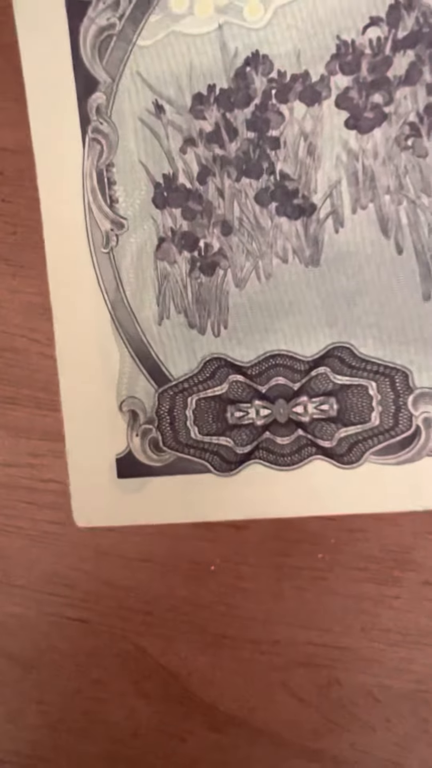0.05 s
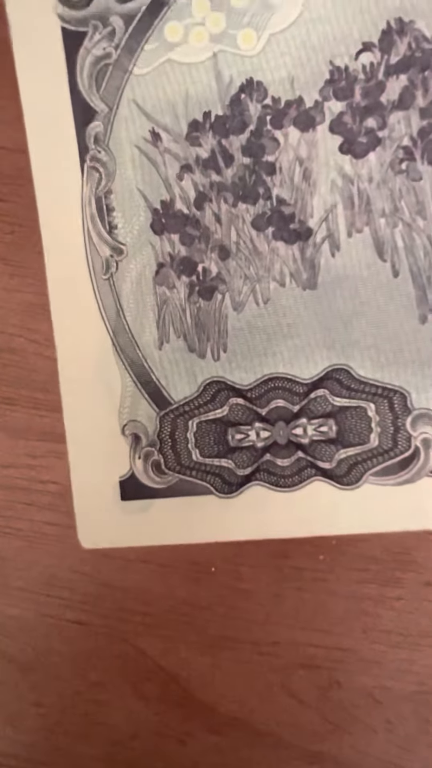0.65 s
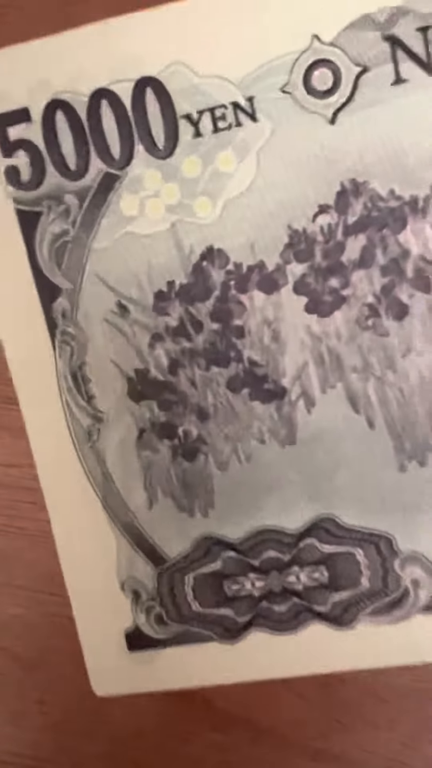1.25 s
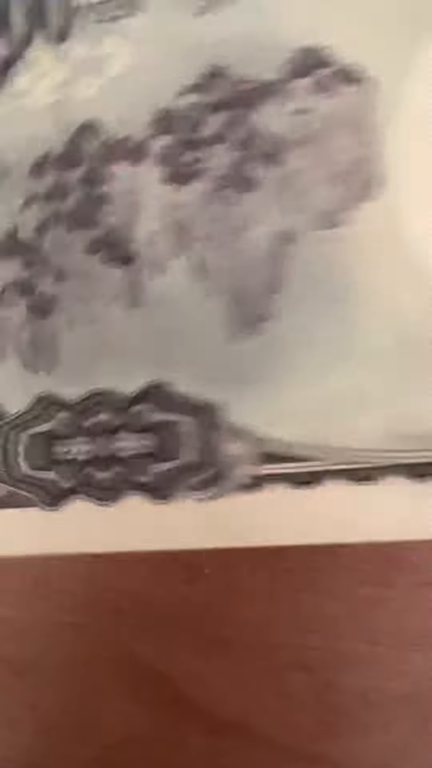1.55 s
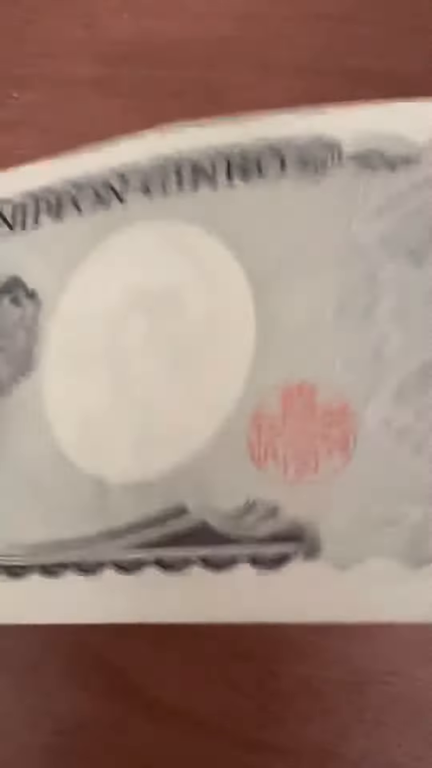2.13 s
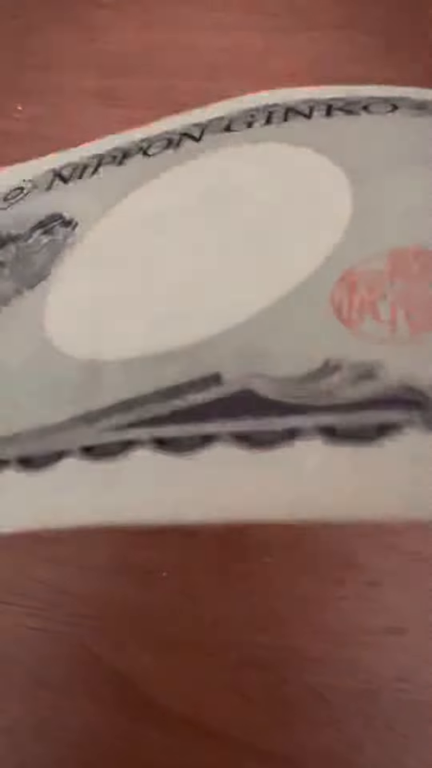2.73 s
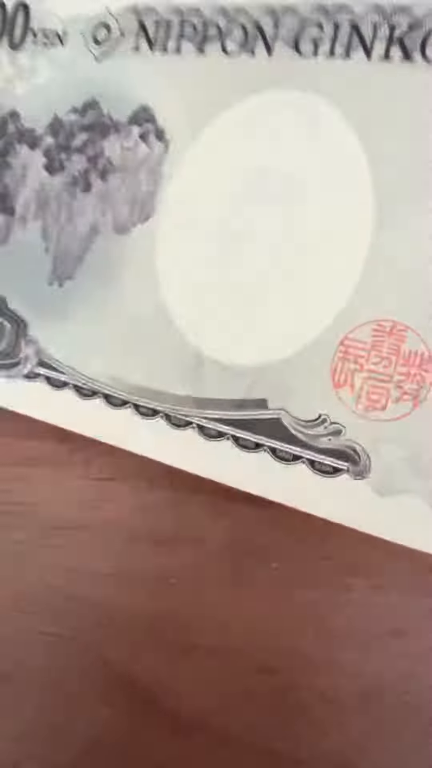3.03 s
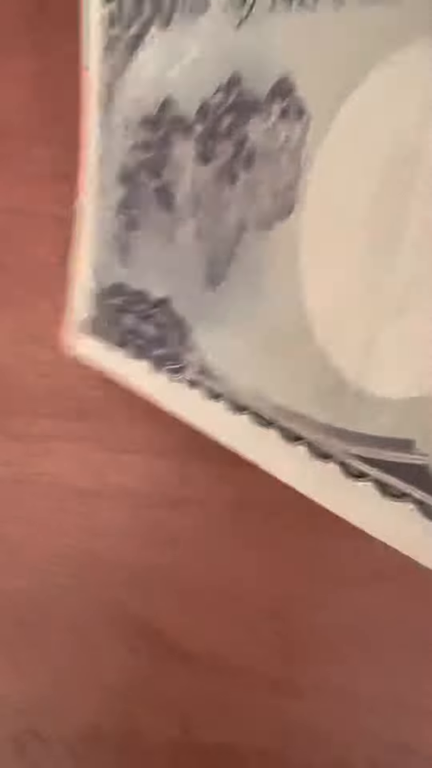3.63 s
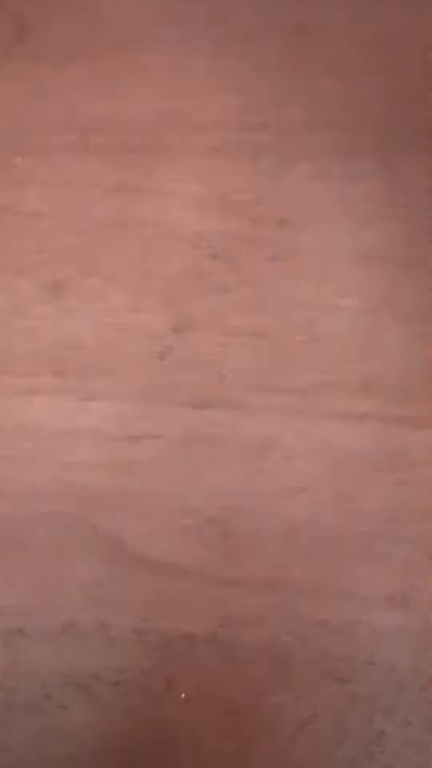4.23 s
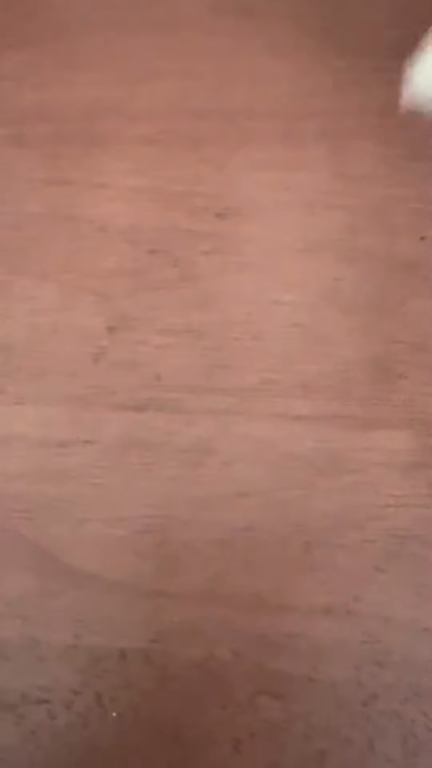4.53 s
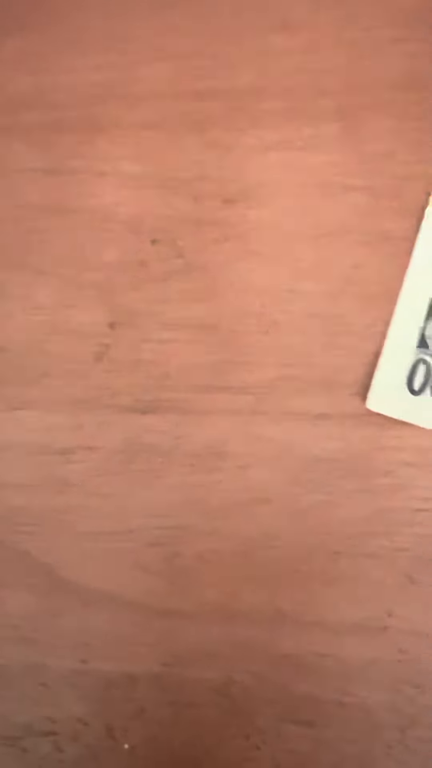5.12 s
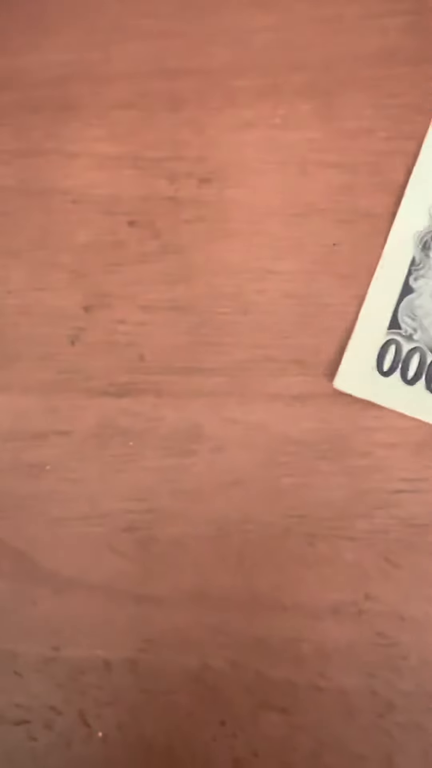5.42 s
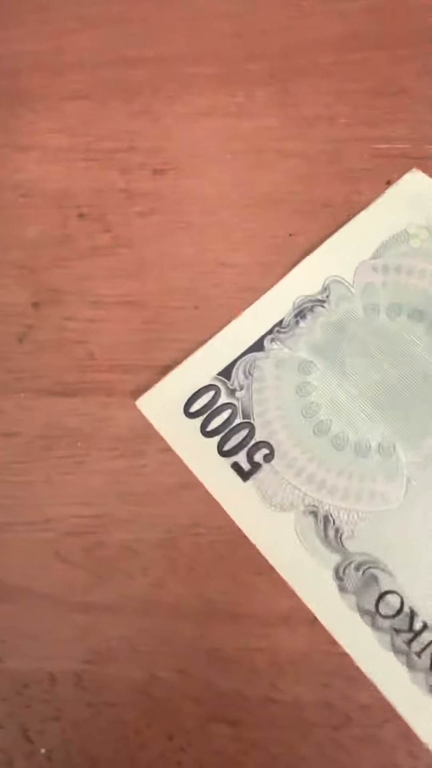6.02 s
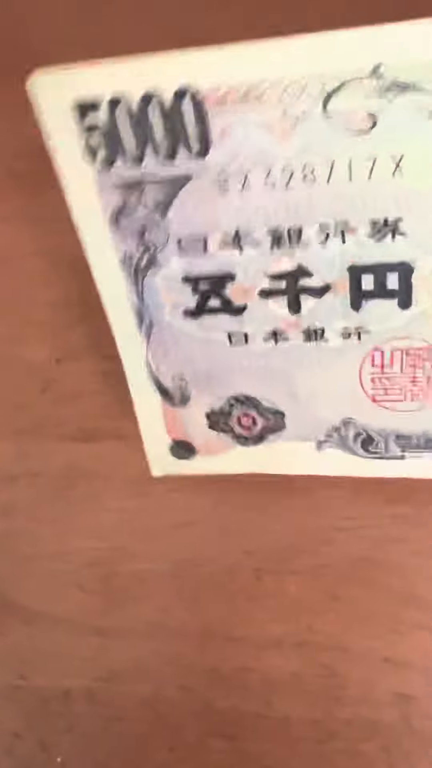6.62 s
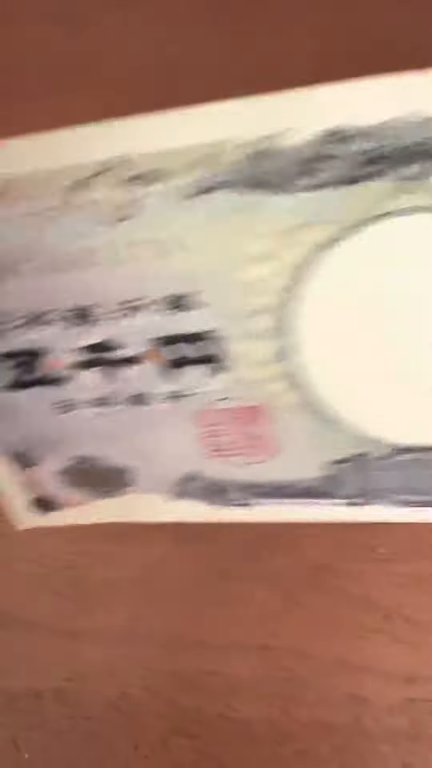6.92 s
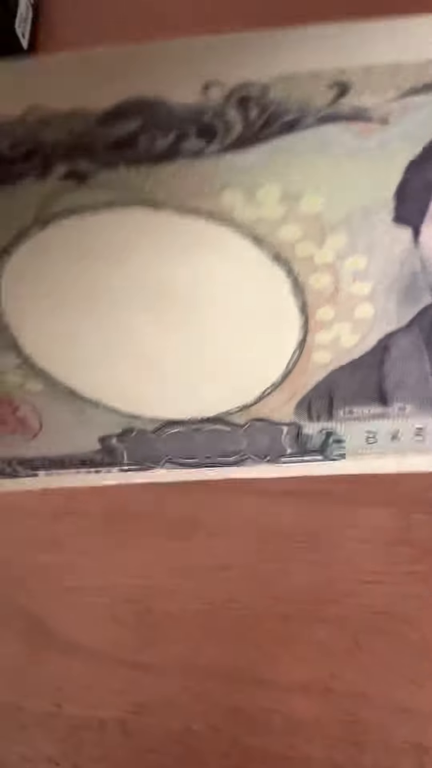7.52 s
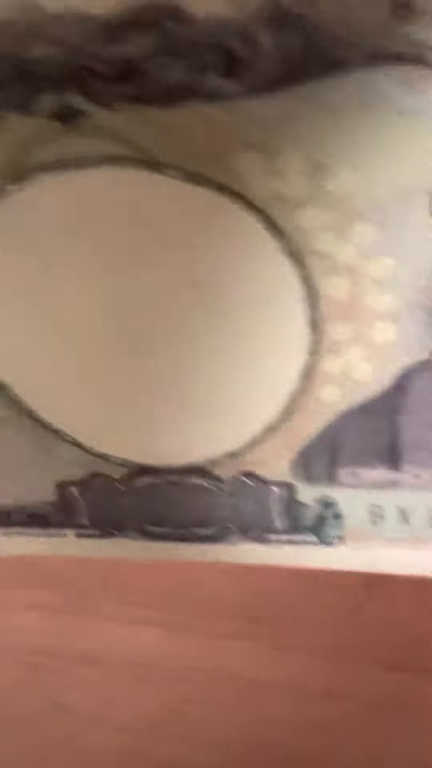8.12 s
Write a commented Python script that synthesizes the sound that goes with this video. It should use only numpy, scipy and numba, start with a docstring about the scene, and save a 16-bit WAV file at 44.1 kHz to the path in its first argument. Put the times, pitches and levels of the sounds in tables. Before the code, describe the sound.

A crisp paper banknote is flexed, flapped, slid over a wooden table and turned over, crinkling close up in a quiet room.

```python
"""A small quiet room, a stereo microphone close over a wooden table, the subject a little to the right.
A crisp paper banknote is picked up, flexed, laid down, slid along the wood and turned over.
The sheet buckles with dull flaps, its creases give way in tiny snaps, fingers rub and thud on it,
and it hisses as it is pushed over the table. At this distance its swings waft air at the microphone.
Behind it the room rumbles and the mains hum."""
import sys
import numpy as np
from scipy import signal
from scipy.fft import rfft, irfft, next_fast_len
from scipy.io import wavfile
from scipy.ndimage import map_coordinates
from numba import njit

SR = 44100
rng = np.random.default_rng(int(sys.argv[2]) if len(sys.argv) > 2 else 0)


def store_pcm(level_fs):
    """Save levels as 16-bit WAV."""
    pcm = np.round(np.clip(level_fs, -1, 1) * 32767).astype(np.int16)
    wavfile.write(sys.argv[1], SR, np.atleast_2d(pcm).T)


N = 368661

# the sheet buckles or lands: (time [s], length [ms], level [dB], top edge [Hz], body [dB],
# air puff [dB], pitch of the modes [ratio], ring of the modes [dB], hollow of the bend [Hz])
FLAPS = [(1.5198, 8.3, 5, 2290, -4, 8, 1.0, 5.5, 1800), (1.618, 2.6, -9.5, 1390, 6, 11, 1.0, -4, 1010),
         (2.9664, 2.4, 0, 1800, 7, -25, 1.0, 4.5, 370),
         (3.0032, 2.8, -3.5, 1900, -0.5, -12, 1.02, 11.5, 1120),
         (3.5, 2.2, -18.5, 3220, 22, 28, 1.0, -9, 247), (4.037, 3.6, -7.5, 3130, 7.5, 1, 1.0, -4, 2870),
         (4.142, 22.4, -5, 2060, 7.5, 16, 0.7, 2.5, 232.4), (4.591, 9.3, -7, 3250, 7, 2, 1.0, 5.5, 1620),
         (4.6462, 1.74, -12.5, 2100, 11.5, -2, 1.0, 7, 1300),
         (6.035, 3.6, -23, 2210, 3, 5, 1.0, -5.5, 1820), (6.286, 3, -4.5, 3180, 9, 17, 1.03, -14, 650),
         (6.317, 7.5, 1, 2160, 6, 8, 1.03, -4, 595), (6.3944, 4.5, -2, 3270, 6.5, 11, 0.75, 4, 1160),
         (7.062, 2.9, -2, 1650, 10, 9, 1.0, 1.5, 500)]
# bending modes that outlast the rest: (frequency [Hz], t60 [s], relative level [dB])
SHEET_MODES = [(363.8, 0.15, 7), (706, 0.11, -9), (1084, 0.064, 0), (1330, 0.06, -15.5), (1627, 0.068, 2.5),
               (1840, 0.073, -3), (2280, 0.065, 0.5)]
# creases give way: (time [s], length [ms], level [dB], tilt [dB/octave])
CRINKLES = [(0.877, 12, -43, 6), (1.66, 9.6, -6.5, -1), (1.666, 20.6, -7, 0), (1.69, 0.72, -22.5, -9),
            (1.819, 15, -20, -1), (1.868, 0.75, -13, -9), (1.896, 5, -16.5, 0), (2.181, 4.6, -25.5, -3),
            (2.2039, 1.6, -26, -8), (2.462, 4.6, -25, 1), (2.511, 5.5, -19.5, -1), (2.558, 6, -33.5, -8.5),
            (2.652, 2.2, -37.5, -13.5), (2.791, 17, -28.5, -4.5), (2.871, 2, -40, -11.5),
            (2.917, 15, -22, -9.5), (3.0013, 10, -16, -2.5), (3.38, 6.5, -30, -6.5),
            (3.698, 4.1, -26.5, -2), (3.7236, 8.2, -26, -1.5), (4.057, 11, -22, 5),
            (4.1268, 6.7, -7.5, -0.5), (4.569, 19, -7, 0), (4.593, 23, -9, 0.5), (4.826, 1.5, -36.5, 6),
            (5.992, 11, -29, 12), (6.074, 3.4, -18, 7), (6.134, 5, -20.5, 4), (6.175, 32, -15.5, 3.5),
            (6.211, 2.6, -19, -1), (6.2497, 21, -7, -0.5), (6.287, 5.4, -7.5, 2), (6.3962, 6.1, -19.5, 3.5),
            (6.725, 7.2, -16, 1.5), (6.761, 13, -18.5, -0.5), (6.963, 5.5, -15, 0.5),
            (7.592, 8.9, -33.5, -4.5), (7.741, 3.6, -35, -5), (8.168, 3.3, -40.5, -1.5)]
# spectrum of one snap of a crease: (frequency [Hz], gain [dB])
SNAP_COLOUR = [(100, -24), (600, -17), (850, -8), (1200, -5), (1800, 2.5), (2150, -1.5), (2650, -7.5),
               (3800, -1), (5200, -3.5), (7000, 2), (9000, -6), (12000, -9), (15000, -14.5)]
# spectrum of the corner flicking off a fingertip: (frequency [Hz], gain [dB])
FLICK_COLOUR = [(150, -27.5), (900, -3), (1700, -3), (2200, -11.5), (3200, 5.5), (4200, 1), (6300, 1.5),
                (8300, 9), (11000, 6), (15500, -3)]
# a finger strokes the paper: (start [s], length [s], rustle [dB], hiss [dB],
# swell from start to end [dB], rasp [Hz], sheen over the hiss [dB])
STROKES = [(1.422, 0.095, -69.5, -69, 13, 1900, -8), (1.531, 0.095, -62.5, -64, 11, 1900, -9),
           (1.691, 0.022, -58, -57, 6.5, 1800, -6), (1.776, 0.039, -60, -65, 3, 1900, -16),
           (1.906, 0.038, -51, -44, 2.5, 1850, -8), (2.028, 0.098, -57.5, -53, 6, 1850, -1.5),
           (2.202, 0.18, -51.5, -54.5, 0, 1923, 2), (2.335, 0.055, -71, -44.5, 4, 1900, 0.5),
           (2.433, 0.11, -59.5, -60, 3.5, 1900, -2), (2.9, 0.021, -54, -51.5, 8.5, 1650, -2),
           (2.951, 0.057, -56.5, -60.5, 16, 1650, -10), (3.049, 0.087, -67, -67, -5, 1600, -13),
           (3.226, 0.18, -65.5, -65, 6.5, 2000, -2.5), (3.444, 0.049, -56, -49.5, 2, 2000, 7.5),
           (3.537, 0.09, -56.5, -58.5, 4, 1800, -4), (3.719, 0.21, -65, -61.5, 5.5, 2200, 2),
           (3.879, 0.16, -56, -60.5, -11, 2500, 9), (4.052, 0.14, -56, -56.5, -5.5, 2200, 1.5),
           (4.244, 0.028, -59, -52, 3.5, 2300, 3), (4.307, 0.088, -64.5, -58.5, -5.5, 2600, -1.5),
           (4.416, 0.12, -60.5, -56.5, -8.5, 2200, 3.5), (4.584, 0.19, -61.5, -58.5, -36.5, 3300, 1.5),
           (5.996, 0.15, -73, -57.5, 0, 2000, -2), (6.18, 0.095, -49.5, -54, 12, 2500, 2),
           (6.315, 0.075, -56.5, -59, -13.5, 2100, 1), (6.419, 0.059, -58.5, -50.5, 4.5, 2200, 0.5),
           (6.481, 0.092, -58.5, -58, 9, 2000, -1), (6.735, 0.065, -61, -66, -2, 1900, -9),
           (6.957, 0.09, -59, -57, 3, 2000, 1), (7.087, 0.055, -61.5, -66, -1.5, 2000, -2),
           (7.516, 0.094, -69, -72, -4.5, 3300, -0.5), (7.747, 0.037, -64, -67, 10.5, 3300, -16)]
# spectrum of the rubbed sheet: (frequency [Hz], relative level [dB])
RUSTLE_COLOUR = [(200, -5), (500, -3.5), (1000, -1), (1350, -2), (1750, -2), (2150, -2.5), (2900, -5),
                 (3400, -2.5), (4400, -4), (5200, -10), (9000, -33.5)]
# spectrum of its rubbed fibres: (frequency [Hz], relative level [dB])
HISS_COLOUR = [(2000, -35.5), (3800, 0), (5000, -4.5), (5700, 3), (6600, 6), (8000, -1), (9000, -3.5),
               (10200, -10), (11500, -5.5), (12800, -11), (15500, -8)]
# pushes along the wood: (start [s], length [s], level [dB], swell from start to end [dB], speed [0-1])
PUSHES = [(5.285, 0.048, -65, -3, 0), (5.397, 0.14, -53, 14.5, 1.0), (5.563, 0.077, -50, 9.5, 0.93),
          (5.682, 0.077, -60, 7, 0.2), (5.805, 0.27, -56, -0.5, 0.05)]
# spectrum of a fast slide: (frequency [Hz], relative level [dB])
FAST_SLIDE_COLOUR = [(800, -16), (2000, -10), (3100, -15), (4400, -8), (5300, -12), (6300, -5.5),
                     (7500, -1.5), (9000, 3.5), (10300, -5), (11300, 1), (13000, -5.5), (15500, 1.5)]
# spectrum of a slow slide: (frequency [Hz], relative level [dB])
SLOW_SLIDE_COLOUR = [(1000, -11.5), (2200, -9), (3000, -16.5), (3900, -14), (5400, -14), (6300, 1.5),
                     (7600, -3.5), (9000, -2.5), (12000, -14), (15500, -6.5)]
# a fingertip meets the taut note, or the table through it: (time [s], pitch [Hz], level [dB], t60 [s])
THUDS = [(1.661, 123, -34.5, 0.14), (4.138, 62, -27, 0.12), (4.142, 165, -30, 0.06),
         (7.0645, 487, -16.5, 0.011), (7.0717, 87, -26.5, 0.11)]
# air shoved at the microphone: (middle [s], half length [ms], level [dB], top edge [Hz])
SWINGS = [(3.675, 32, -44, 113.5), (3.744, 23, -45, 158), (3.961, 32, -46.5, 164), (4.147, 19.5, -35, 200),
          (4.386, 13, -48, 355), (4.449, 39, -49, 175), (4.597, 12, -37, 107)]
# stereo width of the paper at the microphone: (frequency [Hz], side over mid [dB])
PAPER_WIDTH = [(100, -34.5), (350, -24.5), (700, -3), (1200, -9.5), (1900, -25), (2800, -3), (4500, -9.5),
               (7000, -1.5), (12000, -4.5)]
# spectrum of the room tone: (frequency [Hz], relative level [dB])
AIR_COLOUR = [(22, -27), (45, -6), (62, 0), (130, -4.5), (180, -12.5), (260, -9), (400, -10), (520, -16),
              (750, -19), (1100, -27), (1550, -34.5), (1950, -36.5), (2800, -47.5), (5500, -51.5),
              (8000, -52.5), (15500, -62.5)]
# stereo width of the room tone: (frequency [Hz], side over mid [dB])
AIR_WIDTH = [(50, -28), (130, -17.5), (300, -14.5), (550, -3.5), (800, 0.5), (1300, -0.5), (2000, -13.5),
             (4000, -3), (12000, -1.5)]
# mains hum: (frequency [Hz], level [dB])
HUM = [(119.5, -62.5)]
# a wide, low rumble swells: (start [s], length [s], level [dB])
RUMBLES = [(5.04, 0.072, -50), (5.734, 0.56, -57.5)]
# thin bands of hiss in the background: (centre [Hz], width [Hz], level [dB])
HISS_BANDS = [(1900, 400, -89.5), (3317, 140, -88.5), (6840, 220, -95), (9650, 180, -95.5)]


def flaps(t60_at_1khz=0.077, damping_slope=0.73, travel_ms=0.3, rise_share=0.26):
    """Each buckle rings the sheet's crowded bending modes; low ones arrive later and last longer."""
    out, crowd, t = np.zeros((2, N)), 0, np.arange(SR // 5) / SR
    edges_hz = 35 * 2 ** (np.arange(18) / 2)   # half octaves
    length_ms = np.array(FLAPS)[:, 1:2]
    for low, high in zip(edges_hz, edges_hz[1:]):
        hz = np.sqrt(low * high)
        age = t - travel_ms / 1000 * np.sqrt(1000 / hz)   # bending waves speed up as root frequency
        t60 = t60_at_1khz * (1000 / max(hz, 260)) ** damping_slope
        rise = np.clip(age * 1000 / (rise_share * length_ms), 0, 1)
        decay = from_db(-60 * np.maximum(age - length_ms / 1000, 0) / t60)
        push = rise * decay * rng.standard_normal((2, len(FLAPS), len(t)))
        band = energy_one(butter(push, 2, [low, high], "band"))
        crowd = crowd + band * np.sqrt(2 * (high - low) / SR)
    for k, (s, _, db, top_hz, body_db, puff_db, pitch_ratio, ring_db, hollow_hz) in enumerate(FLAPS):
        sheet = crowd[:, k] + from_db(ring_db) * sheet_ring(t, pitch_ratio)
        flap = colour(sheet, lambda hz: db + flap_colour(hz, top_hz, body_db, puff_db)
                      + hollow(hz, hollow_hz))
        add(out, s, flap)
    return stereo(out, PAPER_WIDTH)


def sheet_ring(t, pitch_ratio):
    """The strongest modes of the held sheet die away; they lie lower when it is held slack."""
    out = 0
    for hz, t60, db in SHEET_MODES:
        decay = from_db(-60 * t / t60)
        tone = np.sin(2 * np.pi * (pitch_ratio * hz * t + rng.random((2, 1))))
        out = out + from_db(db) * tone * 2 * decay / decay.sum()
    return out


def flap_colour(hz, top_hz, body_db, puff_db, body_hz=700, puff_hz=130, bass_hz=58, gain_db=-0.5):
    """Gain in dB of a flap: shoved air at the bottom, the sheet's body above, then a steep top edge."""
    air_share = 1 / (1 + (hz / puff_hz) ** 4)
    lows_db = air_share * puff_db + (1 - air_share) * body_db / (1 + (hz / body_hz) ** 4)
    edge = 1 / np.sqrt(1 + (hz / top_hz) ** 10)
    treble_leak = from_db(-25) / (1 + (hz / top_hz / 2) ** 2)
    bass_cut_db = 10 * np.log10(1 + (bass_hz / (hz + 10)) ** 4)
    return gain_db + lows_db + 20 * np.log10(edge + treble_leak) - bass_cut_db


def hollow(hz, centre_hz, peak_db=2.5, width_octaves=0.18):
    """Gain in dB of the cupped sheet, which favours one pitch for each way it is bent."""
    return peak_db / (1 + (np.log2((hz + 1) / centre_hz) / width_octaves) ** 2)


def crinkles(crest=0.27, max_crack_share=0.46, snap_ms=1.05, ring_db=-20, ring_t60=0.082):
    """A crease lets go in a run of uneven snaps; the shorter the run, the more it is one clean crack."""
    runs, cracks, t = np.zeros((2, N)), np.zeros((2, N)), np.arange(SR // 12) / SR
    for s, length_ms, level_db, tilt in CRINKLES:
        snaps = rng.standard_normal((2, len(t))) * uneven((2, len(t)), spread_db=4.0, limit=4)
        swell = np.exp(-((t * 1000 / length_ms - crest) / (1 - crest)) ** 2)
        ring = from_db(ring_db - 60 * t / ring_t60)
        run = energy_one(snaps * (swell + ring))
        crack_share = max_crack_share * (snap_ms / max(length_ms, snap_ms)) ** 2
        parts = np.vstack([np.sqrt(1 - crack_share) * run, np.sqrt(crack_share) * (t == 0)])
        parts = colour(parts, lambda hz: level_db + at_hz(SNAP_COLOUR, hz)
                       + tilt * np.log2(np.clip(hz, 1400, 9000) / 5000))
        add(runs, s, parts[:2])
        add(cracks, s, parts[2:])
    return stereo(runs, PAPER_WIDTH) + cracks


def flick(time_s=4.5805, scatter_db=-7, scatter_t60=0.008):
    """The corner flicks off a fingertip: one hard, bright crack and a brief scatter of smaller snaps."""
    out, t = np.zeros((2, N)), np.arange(SR // 20) / SR
    scatter = energy_one(rng.standard_normal((2, len(t))) * from_db(-60 * t / scatter_t60))
    crack = (t == 0) + from_db(scatter_db) * scatter
    add(out, time_s, colour(crack, lambda hz: at_hz(FLICK_COLOUR, hz)))
    return out


def rubbing(gain_db=-2.0, grip_db=1.1, sheen_hz=10000):
    """Fingers stroke the paper with an uneven grip: the sheet rustles under the hiss of its fibres."""
    powers = np.array([gesture(s, length, 0, swell, attack_db_per_s=798.5, release_db_per_s=504.5)
                       for s, length, _, _, swell, *_ in STROKES])
    _, _, rustle_db, hiss_db, _, rasp_hz, sheen_db = np.transpose(STROKES)
    pitch = (rasp_hz @ powers) / (powers.sum(axis=0) + 1e-30)
    rustle = np.sqrt(from_db(rustle_db) ** 2 @ powers) * sheet_rustle(pitch)
    fibres = fibre_hiss()
    hiss = np.sqrt(from_db(hiss_db) ** 2 @ powers) * butter(fibres, 3, sheen_hz, "low")
    sheen = np.sqrt(from_db(hiss_db + sheen_db) ** 2 @ powers) * butter(fibres, 3, sheen_hz, "high")
    return (rustle + hiss + sheen) * from_db(gain_db + grip_db * drift(45))


def sheet_rustle(rasp_hz, rasp_db=2.5, sway=0.047, crackle_db=-8):
    """The rubbed sheet crackles and rasps at the pitch of its free span."""
    pitch = rasp_hz * np.exp(sway * drift(14))
    grit = friction(RUSTLE_COLOUR, catches_per_s=900, spread_db=-0.5, smooth_db=1.5, judder_db=2.0)
    rasp = np.array([resonate(channel, pitch, q=5.0) for channel in grit])
    ticks = crackle(per_s=110, low_hz=1280, high_hz=4505)
    return rms_one(grit + from_db(rasp_db) * rasp) + from_db(crackle_db) * ticks


def fibre_hiss(squeak_hz=8400, squeak_db=2.0, sway=0.14, crackle_db=-11, snag_db=-9):
    """Rubbed fibres tick and hiss, sharpest at a pitch that wanders with the grip."""
    hiss = friction(HISS_COLOUR, catches_per_s=1900, spread_db=1.5, smooth_db=5.5, judder_db=2.25)
    pitch = np.minimum(squeak_hz * np.exp(sway * drift(9)), SR / 4)
    squeak = np.array([resonate(channel, pitch, q=5.0) for channel in hiss])
    ticks = from_db(crackle_db) * crackle(per_s=244, low_hz=4400, high_hz=9540)
    return rms_one(hiss + from_db(squeak_db) * squeak) + ticks + from_db(snag_db) * snags()


def snags(per_s=45, bunch_db=-1.5):
    """Skin catches on the raised print and lets go with crisp ticks that come in bunches; rms 1."""
    sizes = rng.choice([-1, 1], N) * uneven(N, spread_db=0.5, limit=3)
    ticks = sizes * (rng.random(N) < per_s * from_db(bunch_db * drift(12)) / SR)
    return flexing(colour(ticks, lambda hz: at_hz(HISS_COLOUR, hz))[None])


def sliding(grain_db=-19, drag_db=1.0):
    """Paper on wood: a silky hiss, brighter when faster; it drags unevenly and ticks over the grain."""
    powers = np.array([gesture(s, length, db, swell, attack_db_per_s=420, release_db_per_s=223)
                       for s, length, db, swell, _ in PUSHES])
    speed = np.array(PUSHES)[:, -1]
    fast = friction(FAST_SLIDE_COLOUR, catches_per_s=8900, spread_db=1.0, smooth_db=1.0, judder_db=0.6)
    slow = friction(SLOW_SLIDE_COLOUR, catches_per_s=2900, spread_db=3.0, smooth_db=5.0, judder_db=0.8)
    hiss = np.sqrt(speed @ powers) * fast + np.sqrt((1 - speed) @ powers) * slow
    ticks = np.sqrt(powers.sum(axis=0)) * crackle(per_s=250, low_hz=5700, high_hz=11100, cycles=12)
    return (hiss + from_db(grain_db) * ticks) * from_db(drag_db * drift(30))


def friction(spectrum, catches_per_s, spread_db, smooth_db, judder_db):
    """Fibres catch and let go at random over a smooth hiss, and the contact judders; rms 1."""
    sizes = rng.choice([-1, 1], (2, N)) * uneven((2, N), spread_db, limit=4)
    catches = rms_one(sizes * (rng.random(N) < catches_per_s / SR))
    smooth = from_db(smooth_db) * rng.standard_normal((2, N))
    contact = (catches + smooth) * from_db(judder_db * drift(110))
    return flexing(stereo(colour(contact, lambda hz: at_hz(spectrum, hz)), PAPER_WIDTH))


def crackle(per_s, low_hz, high_hz, cycles=14, pitches=14):
    """Single fibres tick, each ringing briefly at one of a set of pitches; rms 1."""
    sizes = rng.choice([-1, 1], N) * uneven(N, spread_db=-1.0, limit=3)
    ticks = sizes * (rng.random(N) < per_s / SR)
    out, pitch_index = 0, rng.integers(0, pitches, N)
    for k, hz in enumerate(np.geomspace(low_hz, high_hz, pitches)):
        resonance = signal.iirpeak(hz, cycles / 2, fs=SR)
        out = out + signal.lfilter(*resonance, ticks * (pitch_index == k) + 1e-18) / np.sqrt(hz)
    return rms_one(out)


def flexing(x, depth=0.459, changes_per_s=7, nearest_ms=.45, farthest_ms=2.8, sway=.2):
    """Short paths across the bending sheet stretch, come and go, so its resonances keep shifting."""
    out = x
    for lag_ms in np.geomspace(nearest_ms, farthest_ms, 4):
        path = delayed(x, lag_ms * np.exp(sway * drift(5)))
        out = out + depth * drift(changes_per_s) * path
    return rms_one(out)


def thuds(rise_cycles=0.44, sag=0.04):
    """A fingertip's thud swells within a cycle and dies away, sinking in pitch as the pressure eases."""
    out, t = np.zeros((2, N)), np.arange(SR // 4) / SR
    for s, hz, db, t60 in THUDS:
        decay = from_db(-60 * t / t60)
        cycles = np.cumsum(hz * (1 + sag * (decay - .5))) / SR
        rise = 1 - np.exp(-(cycles / rise_cycles) ** 2)
        add(out, s, from_db(db) * rise * decay * np.sin(2 * np.pi * cycles)[None])
    return out


def swings():
    """The swinging note wafts air at the microphone, the same in both channels."""
    out, t = np.zeros((2, N)), np.arange(-SR // 8, SR // 8) / SR
    for s, half_ms, db, top_hz in SWINGS:
        swell = np.exp(-.5 * (t * 1000 / half_ms) ** 2)
        waft = rms_one(swell * low_noise(len(t), top_hz)) * np.sqrt(np.mean(swell ** 2))
        add(out, s + t[0], from_db(db) * waft[None])
    return out


def table_echo(x, delay_ms=1.54, sway=0.1, strength=0.26, scatter_hz=2600):
    """The back of the sheet radiates in opposite phase, and that sound returns off the table."""
    mirrored = butter(x, 1, [120, scatter_hz], "band")   # the curved paper scatters the treble away
    return x - strength * delayed(mirrored, delay_ms * (1 + sway * drift(4.3)))


def room_reverb(x, t60=0.396, first_echo_s=0.018, wall_hz=5000):
    """The walls return diffuse, slightly dull reflections, different in each channel."""
    t = np.arange(SR // 2) / SR
    tail = energy_one(rng.standard_normal((2, len(t))) * from_db(-60 * t / t60) * (t > first_echo_s))
    tail = colour(tail, lambda hz: -10 * np.log10(1 + (hz / wall_hz) ** 2))
    return signal.fftconvolve(x, tail, axes=1)[:, :N]


def background(air_db=-53, waver_db=0.5, rumble_top_hz=140):
    """Room air with thin bands of hiss and a wavering mains hum; apart from it, a faint wide low rumble comes
    and goes, opposite in the two channels."""
    air = colour(rng.standard_normal((2, N)), lambda hz: at_hz(AIR_COLOUR, hz))
    air = from_db(air_db) * rms_one(stereo(air, AIR_WIDTH))
    for centre_hz, width_hz, db in HISS_BANDS:
        band = signal.iirpeak(centre_hz, centre_hz / width_hz, fs=SR)
        air += from_db(db) * rms_one(signal.lfilter(*band, rng.standard_normal((2, N))))
    hum = sum(np.sqrt(2) * from_db(db) * np.sin(2 * np.pi * hz * np.arange(N) / SR) for hz, db in HUM)
    rumble_power = sum(gesture(s, length, db, 0, attack_db_per_s=297, release_db_per_s=297)
                       for s, length, db in RUMBLES)
    rumble = np.sqrt(rumble_power) * low_noise(N, rumble_top_hz)
    return air + hum * from_db(waver_db * drift(5.9)) + np.array([rumble, -rumble])


def gesture(start, length, level_db, swell_db, attack_db_per_s, release_db_per_s):
    """Power of one movement: it sets in, swells or sags evenly while it lasts, and dies away."""
    power = np.zeros(N)
    span = slice(max(int((start - .5) * SR), 0), min(int((start + length + .5) * SR), N))
    age = np.arange(span.start, span.stop) / SR - start
    held_db = level_db + swell_db * (np.clip(age / length, 0, 1) - .5)
    fade_db = attack_db_per_s * np.maximum(-age, 0) + release_db_per_s * np.maximum(age - length, 0)
    power[span] = from_db(held_db - fade_db) ** 2
    return power


def low_noise(size, top_hz, bottom_hz=45):
    """Lumpy bass turbulence of rms 1."""
    return rms_one(butter(rng.standard_normal(size), 2, [bottom_hz, top_hz], "band"))


def drift(per_s):
    """A random wander of rms 1."""
    points = rng.standard_normal(2048)
    return rms_one(np.interp(np.arange(N) / SR * per_s, np.arange(len(points)), points))


def uneven(shape, spread_db, limit):
    """Random gains, most near 1, a few as far off as limit times the spread."""
    return from_db(spread_db * np.minimum(rng.exponential(1, shape), limit))


@njit
def resonate(x, hz, q):
    """A resonance of gain 1 whose centre moves."""
    out, low, band = np.zeros(len(x)), 0.0, 0.0
    for i in range(len(x)):
        step = 2 * np.sin(np.pi * hz[i] / SR)
        low += step * band
        band += step * (x[i] - low - band / q)
        out[i] = band / q
    return out


def colour(x, gain_db):
    """Causal (minimum-phase) filter whose gain in dB is a function of Hz."""
    size = 2 * next_fast_len(x.shape[-1] // 2 + 1)
    hz = np.arange(size // 2 + 1) * SR / size
    cepstrum = irfft(np.log(from_db(gain_db(hz))))
    cepstrum[1:size // 2] *= 2
    cepstrum[size // 2 + 1:] = 0
    return irfft(rfft(x, size) * np.exp(rfft(cepstrum)))[..., :x.shape[-1]]


def stereo(pair, width):
    """Two unrelated signals become left and right, sharing the power as mid and side."""
    mid = colour(pair[0], lambda hz: -10 * np.log10(1 + from_db(at_hz(width, hz)) ** 2))
    side = colour(pair[1], lambda hz: -10 * np.log10(1 + from_db(-at_hz(width, hz)) ** 2))
    return np.array([mid + side, mid - side])


def butter(x, order, hz, kind):
    """Low-, high- or band-pass filter."""
    return signal.sosfilt(signal.butter(order, hz, kind, fs=SR, output="sos"), x)


def delayed(x, lag_ms):
    """Delay each channel by a time that varies."""
    now = np.arange(N)
    return np.array([np.interp(now - lag_ms / 1000 * SR, now, channel) for channel in x])


def at_hz(points, hz):
    """Read a spectrum on a log-frequency axis."""
    f, value = np.transpose(points)
    return np.interp(np.log(hz + 1), np.log(f), value)


def from_db(db):
    """Decibels to gain."""
    return 10 ** (np.asarray(db) / 20)


def rms_one(x):
    """Scale to unit power."""
    return x / np.sqrt(np.mean(x ** 2) + 1e-30)


def energy_one(x):
    """Scale each channel to unit energy."""
    return x / np.sqrt(np.sum(x ** 2, axis=-1, keepdims=True))


def add(out, s, sound):
    """Mix a sound in at a given time."""
    start = int(s * SR)
    out[:, start:start + sound.shape[-1]] += sound[:, :N - start]


def scene(left_lag_ms=0.018, reverb_db=-23):
    """The note close up, a little nearer the right side of the microphone, with the room behind it."""
    note = table_echo(crinkles() + rubbing()) + flaps() + thuds() + sliding() + flick()
    left = map_coordinates(note[0], [np.arange(N) - left_lag_ms / 1000 * SR], order=5)
    note = np.array([left, note[1]])
    return note + from_db(reverb_db) * room_reverb(note) + swings() + background()


def record(dry, cutoff_hz=15750):
    """The microphone signal is cut steeply at the top."""
    return signal.sosfilt(signal.ellip(10, .1, 80, cutoff_hz, fs=SR, output="sos"), dry)


dry = scene()
out = record(dry)
store_pcm(out)
```